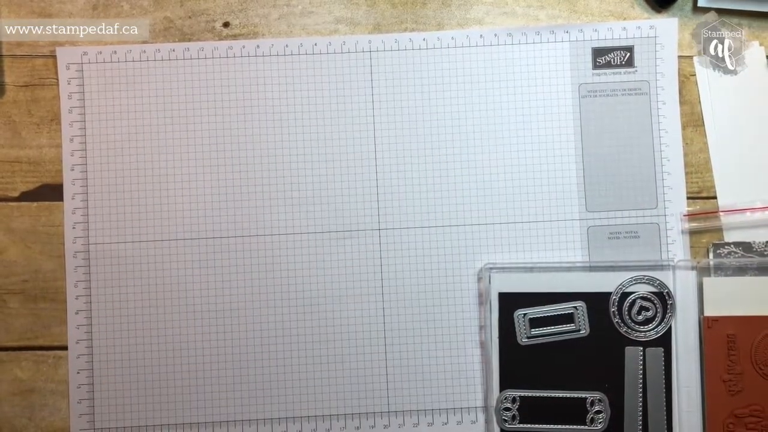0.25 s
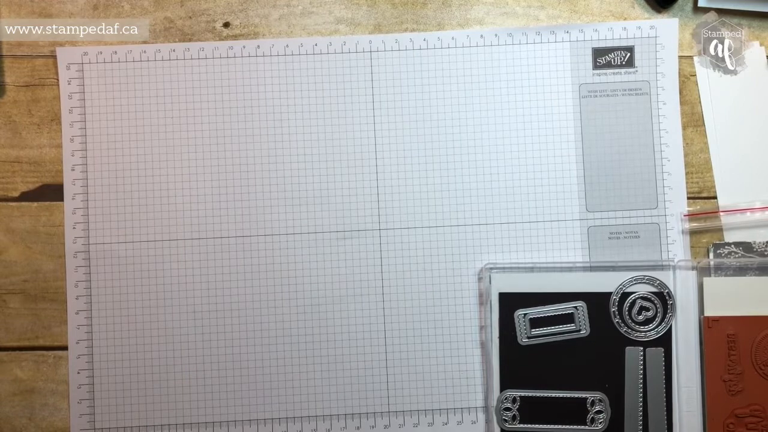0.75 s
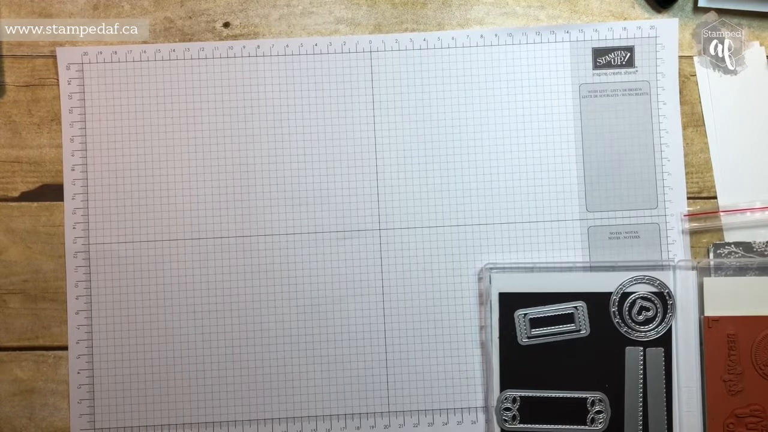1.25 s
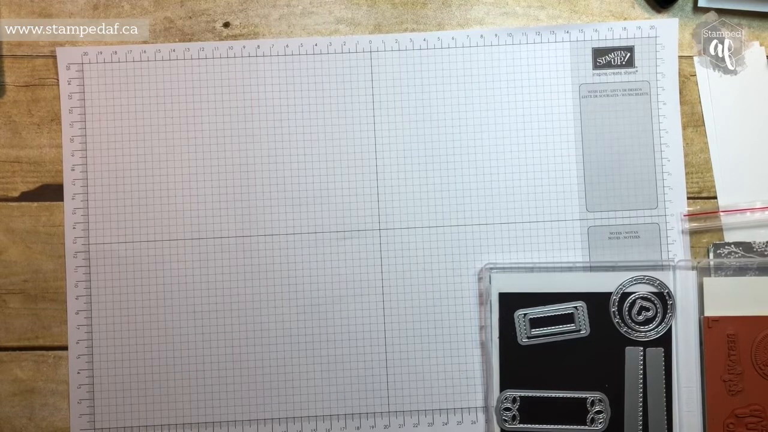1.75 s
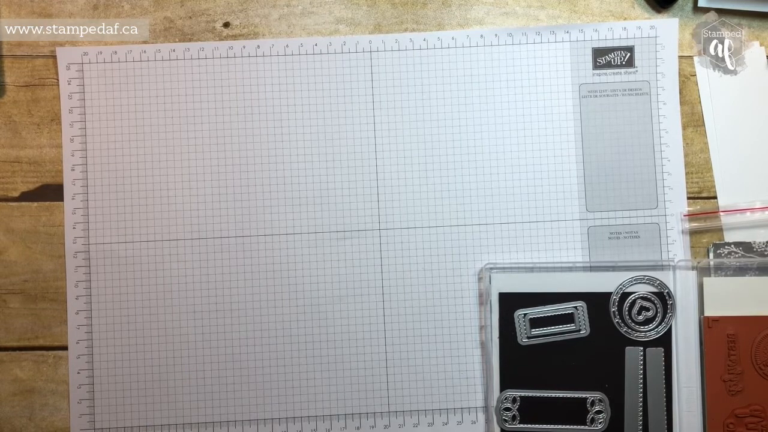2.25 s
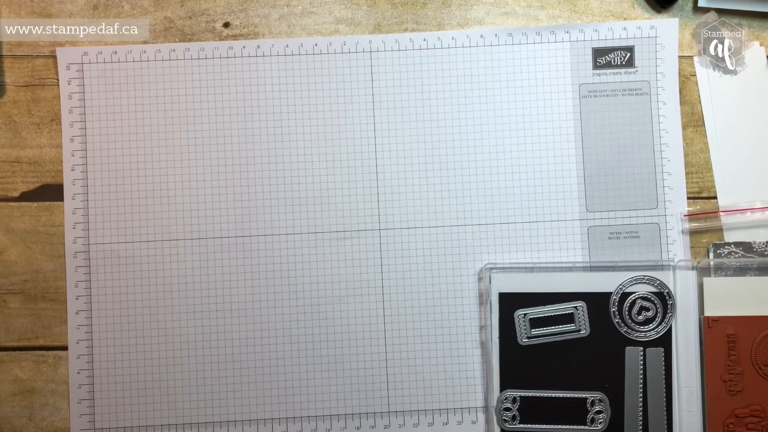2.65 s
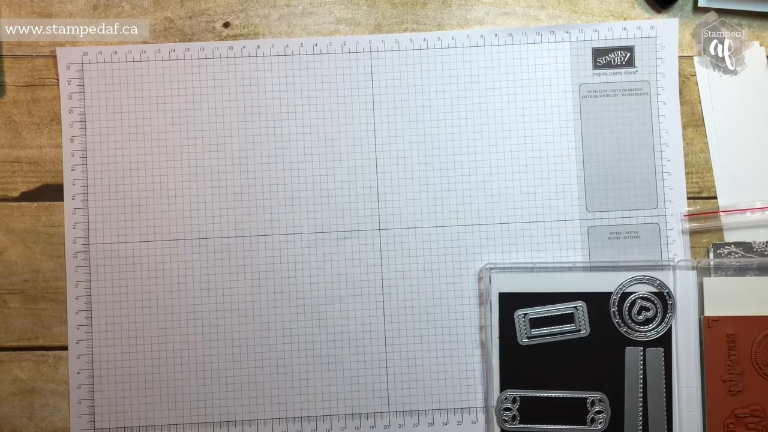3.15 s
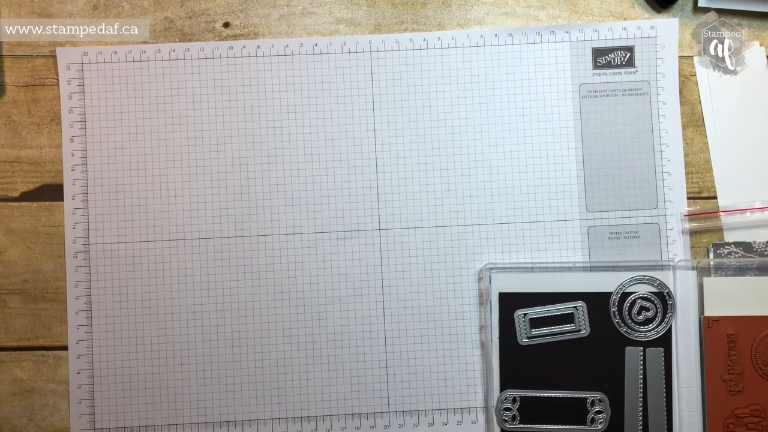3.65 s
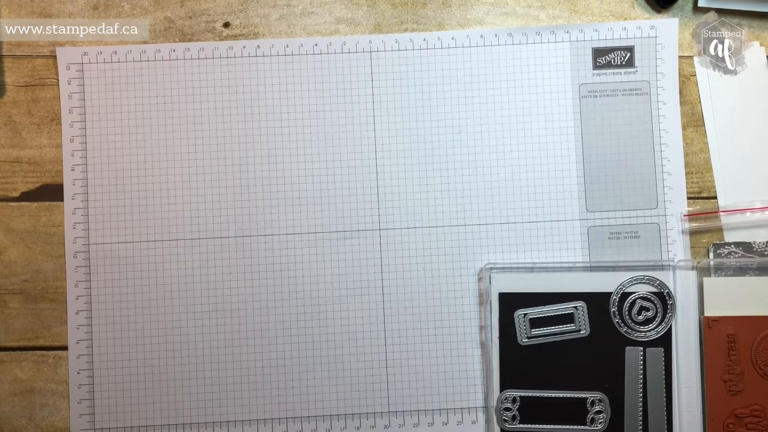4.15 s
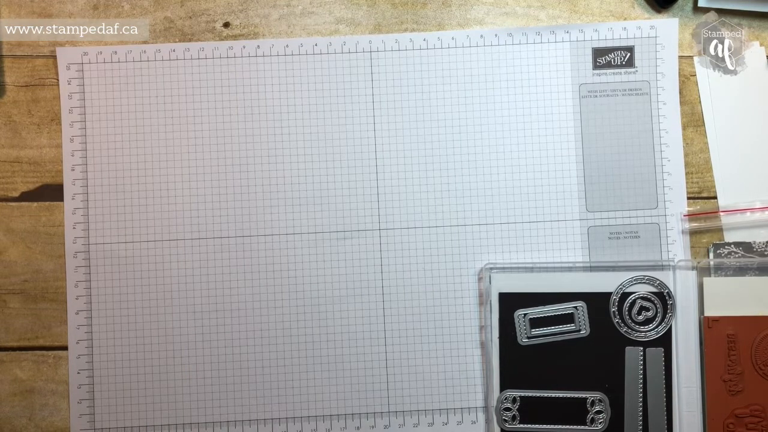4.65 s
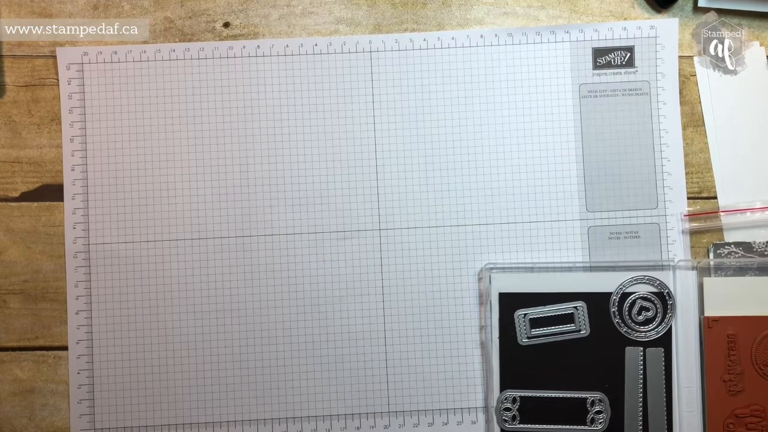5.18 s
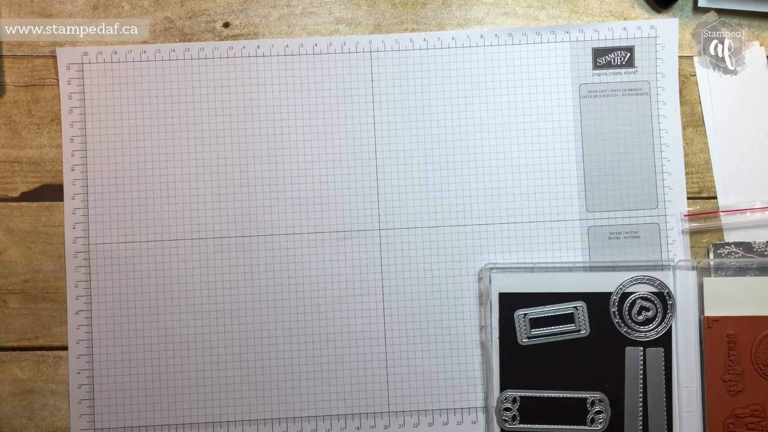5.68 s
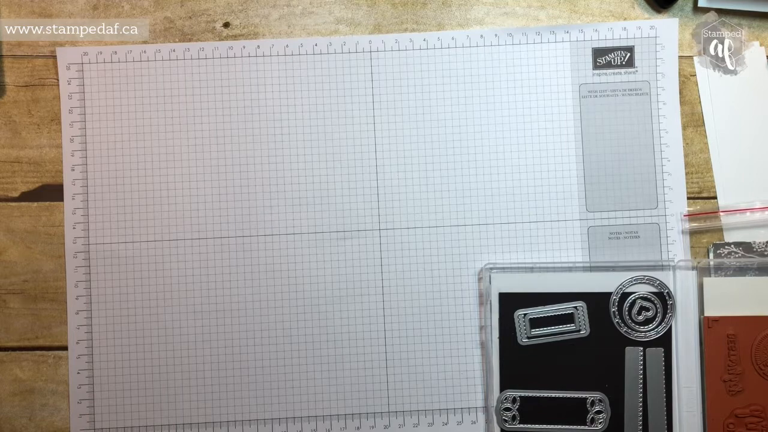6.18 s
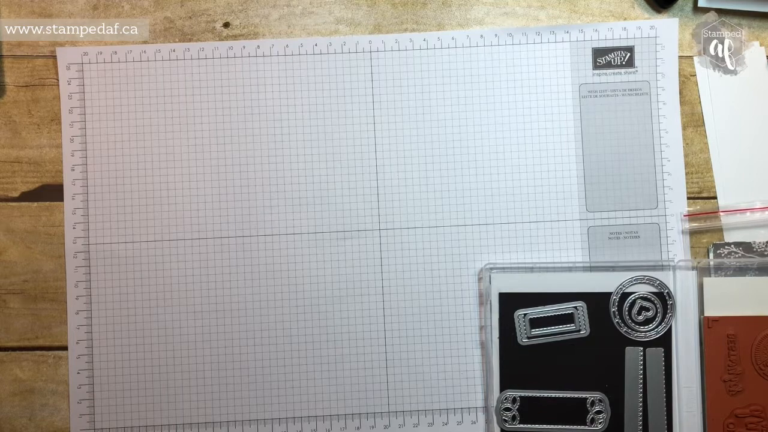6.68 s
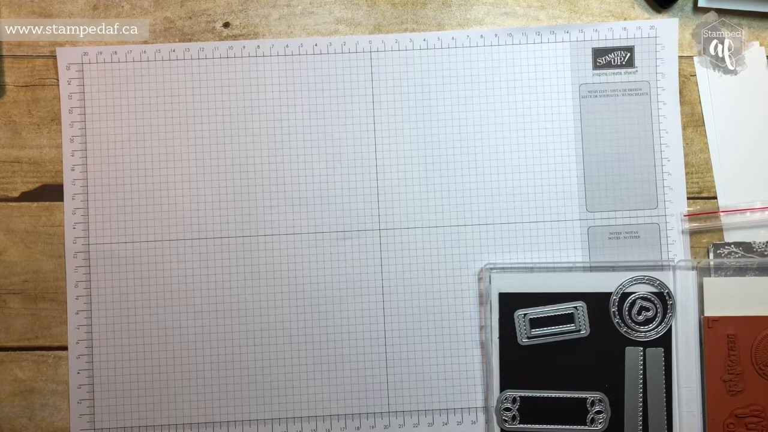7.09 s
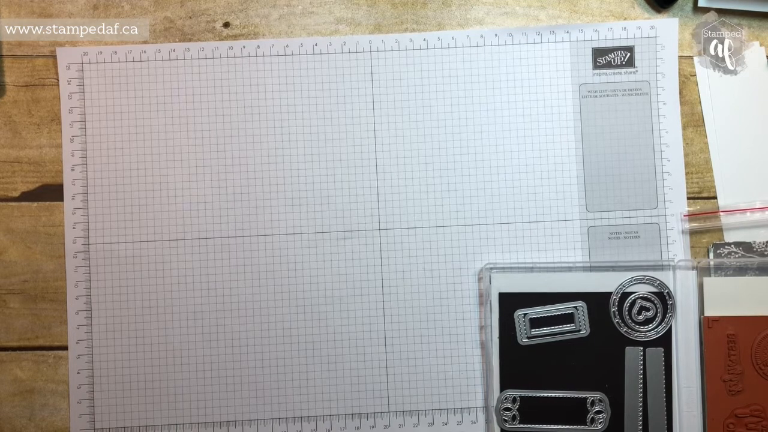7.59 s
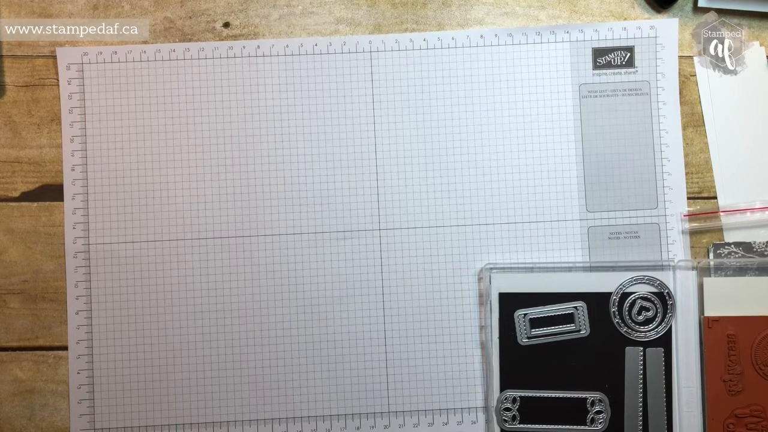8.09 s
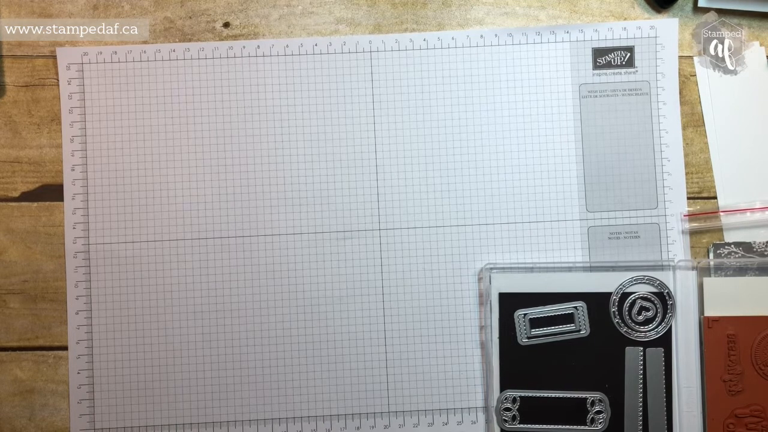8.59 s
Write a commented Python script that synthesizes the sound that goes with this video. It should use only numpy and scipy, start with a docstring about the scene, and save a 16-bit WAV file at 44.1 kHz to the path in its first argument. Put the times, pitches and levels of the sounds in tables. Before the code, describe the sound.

Close-up craft table sounds: dull sliding and a couple of knocks first, a few light metallic clinks, then rapid scratchy brushing on thin metal, hissy and slightly ringing. After a short gap the strokes return slower and more separated. Brushing ends, a hard clattering knock hits the table, and after near quiet there is a brief rustle and a softer bump. A faint steady fan hums throughout, with short room reflections.

```python
"""A stiff brush scrubs a thin metal cutting die on a craft table, in quick strokes and then slower ones.
Random bristle flicks and hiss drive coloured scratch, rub and fizz layers and the resonances of the die.
Snagging tufts tick: noise bursts plus decaying die modes; some clinks add two clean partials.
Things slide (swelling dull noise) and bump on the table (decaying modes, clatter), once with a loud knock.
A fan, coloured noise with wavering tones, hums in the small room, whose echo is decaying noise."""
import sys
import numpy as np
from scipy import signal
from scipy.io import wavfile
from scipy.ndimage import uniform_filter1d

SR = 44100
rng = np.random.default_rng(int(sys.argv[2]) if len(sys.argv) > 2 else 0)


def store_wav(level_fs):
    """Save 16-bit WAV to argv[1]."""
    pcm = np.round(np.clip(np.atleast_2d(level_fs), -1, 1) * 32767)
    wavfile.write(sys.argv[1], SR, pcm.T.astype(np.int16))


N = 389403

# bumps on the table: [t/s, rel. level/dB, thump/dB, clack/dB, crack/dB (bands re level), f of the thing/Hz]
KNOCKS = [(0.441, -25.5, -14, -2.5, -10.5, 1084), (0.536, -29, -11, -15, -10.5, 682),
          (0.781, -45, -23, -7, 0, 1170), (2.679, -30, -14, -9, -20, 320), (2.721, -47, -1, -16, -20, 330),
          (3.497, -38, -5, 0, -20, 318), (3.562, -36, -18, -6, -20, 340), (6.016, -42, -20, -14, -31, 684),
          (6.744, -41, -10, -3, -28, 995), (7.154, -27, -2.5, -14, -14.5, 324),
          (7.231, -18, -7, -3, -9.5, 360), (7.294, -12, -15, -3, -17, 692), (7.338, -22, -4, -7, -8, 344),
          (7.361, -28.5, -7, -11, -19, 644), (8.613, -37.5, -2, -3, -5, 1230),
          (8.756, -23, -8, -8, -20, 605)]
# resonances of the die, low, middle and high group: [f/Hz, nominal width/Hz, rel. level/dB]
DIE_MODES = [
    [(1247, 23, -11), (1705, 82, 8.5), (2283, 48, 4)],
    [(2847, 18, 2.5), (3000, 31, 0), (3135, 68, 8), (3340, 37, 3), (3370, 17, -2), (4000, 46, -6)],
    [(4060, 150, -22), (4960, 240, 0), (5150, 41, -18), (5380, 140, 1.5), (5776, 46, -2.5)],
]
# brush strokes: [t/s, swell/s, fade/s, rel. level/dB, rub of the backing/dB, fizz of the tips/dB,
# f where the die rings/Hz, ring/dB] (rub, fizz and ring re level, before layer trims)
STROKES = [(0.323, 0.022, 0.6, -65.5, -7, -15, 3190, -14), (0.556, 0.042, 0.047, -43, -12, -9.5, 4960, -8),
           (0.645, 0.031, 0.2, -60.5, -0.5, 0.5, 4900, -7), (1.014, 0.15, 0.097, -59.5, -17, -6, 4500, -9),
           (1.534, 0.041, 0.146, -42, -10.5, -4, 5150, -3), (1.656, 0.058, 0.144, -50, -25, -9, 1650, -3),
           (1.82, 0.018, 0.15, -44.5, -12, -4.5, 4900, -6),
           (1.949, 0.11, 0.037, -47.5, -13, -3, 1666, -0.5), (2.114, 0.058, 0.03, -46, -15, -7.5, 1650, 4),
           (2.17, 0.02, 0.066, -39.5, -13, -7.5, 3220, -0.5),
           (2.275, 0.047, 0.067, -46.0, -3.5, -7, 3270, -6), (2.391, 0.065, 0.12, -46, -1, -6, 1280, -4),
           (2.552, 0.08, 0.11, -47, 1.5, -3, 2830, 2.5), (2.664, 0.054, 0.081, -37.5, -12, -3.5, 3295, -2),
           (2.827, 0.047, 0.16, -46.5, 1, -0.5, 2930, 2), (2.954, 0.039, 0.12, -44, -8.5, -4, 1980, -2),
           (3.092, 0.056, 0.095, -45, -5, -1.5, 3150, -0.5), (3.229, 0.063, 0.074, -45.0, -2, -2, 3150, -4),
           (3.4, 0.037, 0.23, -45, -6, -6, 3005, -4.5), (3.524, 0.055, 0.027, -46.5, 1.5, -6, 3190, -1),
           (3.687, 0.053, 0.12, -52, -2.5, -4.5, 3170, -4), (3.849, 0.051, 0.03, -55.5, 0, -8, 3220, 0),
           (3.946, 0.052, 0.45, -67, -4, -3.5, 3860, -7), (4.269, 0.1, 0.16, -45, -9, -11.5, 4900, -16),
           (4.612, 0.057, 0.055, -42.5, -6.5, -5.5, 5380, -3.5),
           (4.801, 0.081, 0.077, -59, 0.5, -1, 5380, 4.5), (4.91, 0.024, 0.095, -49, -9, -4.5, 4960, -5),
           (5.055, 0.024, 0.52, -69.5, 0, -5, 5380, -6), (5.19, 0.066, 0.084, -48, -7, -6, 5000, -6.5),
           (5.334, 0.033, 0.47, -71.5, -4, -8, 3190, -3.5), (5.525, 0.059, 0.05, -47, -3.5, -4, 3190, -4),
           (5.769, 0.018, 0.14, -53.5, -4.5, -7, 3830, -6), (5.827, 0.055, 0.038, -59, 0, 1, 3020, 9),
           (6.029, 0.017, 0.068, -48.0, -2, -8.5, 3420, -3.5), (6.081, 0.043, 0.08, -52, -6, -3, 3190, -20),
           (6.262, 0.034, 0.088, -46.5, -4, -4.5, 3230, -18), (6.403, 0.019, 0.068, -56, 6, -5, 2830, 3)]
# spectrum of the bristle tips: [f/Hz, rel. level/dB]
FIZZ_SPECTRUM = [(3000, -41.5), (6000, -9.5), (7300, -3), (8300, 0), (9300, 2), (10300, 1.5), (12000, -1.5),
                 (14500, 0.5), (16000, -10)]


def gain_of(db):
    """Decibels to amplitude."""
    return 10 ** (np.asarray(db) / 20)


def evened(x):
    """Scales to rms 1."""
    return x / np.sqrt(np.mean(x ** 2) + 1e-20)


def struck(x, size=441):
    """Scales a hit so that its loudest 10 ms have rms 1."""
    return x / np.sqrt(uniform_filter1d(x ** 2, size).max() + 1e-20)


def read(points, hz):
    """Interpolates a curve on a log-frequency axis."""
    f, value = np.transpose(points)
    return np.interp(np.log(hz + 1), np.log(f), value)


def add(mix, start_s, sound):
    """Mixes a sound in at a time."""
    part = mix[max(round(start_s * SR), 0):][:len(sound)]
    part += sound[:len(part)]


def butter(x, order, hz, kind):
    """Causal Butterworth filter."""
    return signal.sosfilt(signal.butter(order, hz, kind, fs=SR, output="sos"), x)


def colour(x, points, size=4096):
    """Causal minimum-phase filter of energy 1 with the given spectral shape."""
    log_gain = np.log(gain_of(read(points, abs(np.fft.fftfreq(size, 1 / SR)))))
    min_phase = np.exp(np.conj(signal.hilbert(log_gain)))
    taps = np.fft.ifft(min_phase).real[:size // 2]
    return signal.oaconvolve(x, taps / np.linalg.norm(taps))[:len(x)]


def resonate(x, hz, width_hz):
    """A resonance of gain 1 at its centre."""
    return signal.lfilter(*signal.iirpeak(hz, hz / width_hz, SR), x)


def wander(x, depth_db, size=1024, order=7, count=7):
    """The contact point moves, so narrow bands swell and fade briefly: random gain patches on an STFT."""
    overlap = size * 3 // 4
    z = signal.stft(x, nperseg=size, noverlap=overlap)[2]
    patches = rng.standard_normal(z.shape)
    for axis, span in ((0, order), (1, count), (0, order // 2), (1, count // 2)):
        patches = uniform_filter1d(patches, span, axis)
    gain = gain_of(depth_db * np.tanh(evened(patches)))
    return evened(signal.istft(z * gain, nperseg=size, noverlap=overlap)[1][:N])


def swell(rise_s, fade_s):
    """Envelope of one sliding movement: it touches down, gathers speed and eases off."""
    touch_s, landing_db, fade_db = 0.0026, -11, -21  # levels re crest, fade_db after fade_s
    fade_bend = 1.02  # above 1 the fade steepens as the brush lifts
    t = np.arange(0, rise_s + 3 * fade_s, 1 / SR)
    rise_shape_db = landing_db * np.maximum(1 - t / rise_s, 0)
    fade_shape_db = fade_db * (np.maximum(t - rise_s, 0) / fade_s) ** fade_bend
    return np.minimum(t / touch_s, 1) * gain_of(rise_shape_db + fade_shape_db)


def effort(movements):
    """Power sum of overlapping movements [t/s, swell/s, fade/s, level/dB], as amplitude."""
    power = np.zeros(N)
    for start_s, rise_s, fade_s, db in movements:
        add(power, start_s, (gain_of(db) * swell(rise_s, fade_s)) ** 2)
    return np.sqrt(power)


def fan(air_db=-56.5, hum_trim_db=-1, waver_rms_hz=1.624):
    """Steady rush of air, as coloured noise, with slightly wavering motor tones."""
    # air rush: [f/Hz, rel. level/dB]
    air_spectrum = [(15, -34), (25, -75), (47, -14.5), (127, -5), (200, -11.5), (256, -5.5), (326, -16),
                    (476, -16.5), (516, -22.5), (775, -21), (1100, -28), (1740, -33.5), (2910, -37.5),
                    (3520, -36.5), (16000, -46)]
    # motor tones: [mean f/Hz, rms level before trim/dB]
    hum_tones = [(91.5, -92), (118.4, -62.5), (177.6, -62.5), (253.0, -72), (296.1, -68.5), (360.7, -71),
                 (721.4, -101), (791.3, -76)]
    out = gain_of(air_db) * evened(colour(rng.standard_normal(N), air_spectrum))
    for hz, db in hum_tones:
        drift_hz = waver_rms_hz * evened(uniform_filter1d(rng.standard_normal(N), size=4000))
        cycles = np.cumsum(hz + drift_hz) / SR + rng.random()
        out += gain_of(db + hum_trim_db) * np.sqrt(2) * np.sin(2 * np.pi * cycles)
    return out


def room(x, first_s=0.0028, size=256):
    """Dense reflections of a small room, each band dying at its own speed."""
    # decay of the room: [f/Hz, t60/s]
    room_decay = [(120, 0.19), (500, 0.3), (1500, 0.25), (3000, 0.27), (5500, 0.18), (9000, 0.18),
                  (16000, 0.14)]
    taps = rng.standard_normal(SR // 2) * (np.arange(SR // 2) > first_s * SR)
    hz, t, z = signal.stft(taps, SR, nperseg=size)
    decay_db = -60 * t / read(room_decay, hz)[:, None]
    tail = signal.istft(z * gain_of(decay_db), SR, nperseg=size)[1]
    return signal.fftconvolve(x, tail / np.linalg.norm(tail))[:N]


def handling(trim_db=-3, wander_db=6.0):
    """Soft, dull rustle of fingers and paper sliding on the table: noise under swelling envelopes."""
    # slides: [t/s, swell/s, fade/s, level before trim/dB]
    slides = [(0, 0.026, 0.15, -49.5), (0.1, 0.37, 0.9, -53.5), (1.08, 0.18, 0.3, -54.5),
              (1.3, 0.15, 0.35, -49.5), (1.6, 0.22, 0.39, -48), (6.4, 0.11, 0.4, -54),
              (6.73, 0.024, 0.046, -50.5), (7.9, 0.03, 0.069, -63), (8.58, 0.012, 0.091, -43),
              (8.69, 0.016, 0.11, -43), (8.74, 0.1, 0.25, -44)]
    # slide noise: [f/Hz, rel. level/dB]
    slide_spectrum = [(60, -15), (200, 0), (450, 2.5), (800, -6.5), (1400, -6.5), (2200, -15),
                      (4000, -18.5), (8000, -25), (16000, -42)]
    rustle = colour(wander(rng.standard_normal(N), wander_db), slide_spectrum)
    return gain_of(trim_db) * effort(slides) * rustle


def knocks(trim_db=-7, body_db=-2, thump_trim_db=-1, crack_trim_db=-2, rise_s=0.000754, contact=0.81,
           bounce_s=0.0062, clatter_s=0.0088, crack_s=0.021,
           boom_db=-8, boom_hz=134, boom_t60_s=0.24, boom_rise_s=0.01, own_db=-3, own_t60_s=0.024):
    """An edge lands, bounces once and rings the table while loose parts clatter; balanced in four bands."""
    # modes of the table and what lies on it: [f/Hz, rel. level/dB, t60/s]
    table_modes = [(57, -16, 0.38), (181, 1, 0.41), (223.5, 5.5, 0.26), (316.5, 5, 0.085), (350, 3, 0.12),
                   (364, 6, 0.078), (613, -4, 0.037), (652, 1.5, 0.029), (745, -14, 0.099),
                   (1032, -15, 0.071), (1059, 3.5, 0.1), (1230, -20, 0.077), (1304, 7, 0.041),
                   (1630, -38, 0.044), (1746, 10, 0.024), (1900, -18, .05), (2535, -4.5, 0.074),
                   (2740, -2, 0.1), (4300, -29, .06)]
    # loose parts: [f/Hz, rel. level/dB]
    clatter_spectrum = [(45, -6), (110, 0), (350, -5), (500, -6.5), (740, -9.5), (1150, 1.5), (1750, -13),
                        (2150, -13.5), (2700, -20.5), (4000, -25), (5800, -27), (8500, -36.5),
                        (16000, -40.5)]
    out, t = np.zeros(N), np.arange(SR // 2) / SR
    bands_hz = [(55, 230), (250, 1100), (1100, 2100), (2400, 16000)]  # thump, body, clack, crack
    ring = sum((-1) ** k * gain_of(db - 60 * t / t60_s) * np.sin(2 * np.pi * hz * t)
               for k, (hz, db, t60_s) in enumerate(table_modes))
    # the whole table top takes a moment to swing, then booms on
    boom_env = gain_of(-60 * t / boom_t60_s) * (1 - np.exp(-t / boom_rise_s))
    boom = struck(np.sin(2 * np.pi * boom_hz * t) * boom_env)
    attack = 1 - np.exp(-t / rise_s)
    for start_s, db, thump_db, clack_db, crack_db, own_hz in KNOCKS:
        hit_db = trim_db + db
        touches = np.zeros(len(t))
        add(touches, 2 * rise_s, np.ones(1))
        add(touches, 2 * rise_s + bounce_s * rng.uniform(0.848, 1.2), np.ones(1))
        loose = colour(rng.standard_normal(len(t)), clatter_spectrum)
        blow = struck(ring) + contact * struck(colour(touches, clatter_spectrum))
        blow += struck(loose * np.exp(-t / clatter_s))
        rattle = loose * np.exp(-t / crack_s)  # the treble is all loose parts
        levels_db = (thump_trim_db + thump_db, body_db, clack_db, crack_trim_db + crack_db)
        for band_hz, source, part_db in zip(bands_hz, (blow, blow, blow, rattle), levels_db):
            part = butter(source * attack, 2, band_hz, "bandpass")
            add(out, start_s, gain_of(hit_db + part_db) * struck(part))
        add(out, start_s, gain_of(hit_db + thump_db + boom_db) * boom)
        # the thing itself rings briefly
        own = np.sin(2 * np.pi * own_hz * t) * gain_of(-60 * t / own_t60_s) * attack
        add(out, start_s + 2 * rise_s, gain_of(hit_db + own_db) * struck(own))
    return out


def shaken(level_re_knock_db=-46, t60_s=0.57, rise_s=0.012, ring_hz=2700):
    """Each knock shakes a loose metal piece on the table, and it rings on faintly."""
    out, t = np.zeros(N), np.arange(SR) / SR
    envelope = gain_of(-60 * t / t60_s) * (1 - np.exp(-t / rise_s))
    ring = struck(np.sin(2 * np.pi * ring_hz * t) * envelope)
    for start_s, db, *_ in KNOCKS:
        add(out, start_s, gain_of(level_re_knock_db + db) * ring)
    return out


def pings(t60_s=0.08):
    """The loosely held die clinks: two clean partials of the thin metal die away."""
    # clinks: [t/s, level of main/dB, main f/Hz, second f/Hz, second re main/dB]
    clinks = [(1.2654, -39.5, 1307, 1662, -2), (1.362, -47, 3520, 1660, -2), (2.401, -38, 1327, 1400, -6.5),
              (2.482, -39, 1320, 2800, -4.5), (4.428, -43, 5180, 5400, -4), (7.671, -48, 5760, 2500, -6)]
    out, t = np.zeros(N), np.arange(SR // 4) / SR
    for start_s, db, hz, second_hz, second_db in clinks:
        tones = np.sin(2 * np.pi * hz * t) + gain_of(second_db) * np.sin(2 * np.pi * second_hz * t)
        add(out, start_s, gain_of(db - 60 * t / t60_s) * tones)
    return out


def snags(count=2, level_db=-3, scatter_db=3.5, scatter_s=0.025, scatter_oct=0.66, snap_db=-23, ring_db=1):
    """Light chance ticks near each stroke, their level following it; rows as in the tick table."""
    chance = rng.standard_normal((len(STROKES), count, 3))
    rows = []
    for (start_s, rise_s, _, db, _, _, hz, _), draws in zip(STROKES, chance):
        for when, size, pitch in draws:
            snag_s = start_s + abs(rise_s + scatter_s * when)
            snag_hz = np.clip(hz * 2 ** (scatter_oct * pitch), 1200, 5800)
            rows.append((snag_s, db + level_db + scatter_db * size, snag_hz, snap_db, ring_db))
    return rows


def ticks(trim_db=-9, snap_trim_db=2, snap_s=0.00084, rattle=0.55, rattle_s=0.014,
          free=0.95, reach_oct=0.25, cut=0.17):
    """A caught tuft lets go: a sharp snap, a short rattle, and the nearest modes of the die ring on freely."""
    # snagging tufts and handling of the die: [t/s, rel. level/dB, centre f of ring/Hz,
    # snap before trim/dB, ring/dB] (snap and ring re level)
    tick_events = [(0.56, -47, 1190, -18, -16), (1.2634, -41, 1300, -3, 1), (1.3084, -50, 1200, -3, -3),
                   (1.362, -41, 3630, -4, -22), (1.4744, -51, 3470, -2, -9), (1.5424, -40, 5150, 1.5, 1),
                   (1.6362, -41.5, 5190, 5, 2), (1.932, -29, 5300, -9.5, -2.5),
                   (2.4005, -34.5, 1330, -12, -13), (2.4836, -31.5, 1500, -10, -4),
                   (2.6239, -29.5, 2760, -30, -16), (2.6784, -42.5, 3130, -17, 9.5),
                   (2.9956, -33.5, 3200, 7, -4), (3.2891, -39, 3100, -20, 4), (3.4032, -43, 2940, -18, -15),
                   (3.5528, -33, 1750, -18, 2.5), (4.159, -51.5, 3850, -27, -16),
                   (4.2704, -48, 3550, -20, -10), (4.4278, -46.5, 5110, 1, 12),
                   (4.6305, -39, 5970, -16, 2.5), (4.849, -54, 5430, -12, 18.5),
                   (4.9213, -35.5, 4840, -18, 3.5), (5.0644, -60, 5650, -10, 3),
                   (5.574, -47, 3150, -6, -11), (5.7718, -51, 3930, -19, -14), (6.2716, -36, 3080, -14, 2),
                   (6.4113, -33.5, 2740, -12, -9), (7.5284, -55.5, 3100, -16, -4),
                   (7.6707, -37.5, 4930, -14, -3), (7.777, -49.5, 3060, -10, -4), (8.5842, -51, 1130, 4, 5),
                   (8.702, -45, 1700, -12, -11)]
    # body of the snap: [f/Hz, rel. level/dB]
    snap_spectrum = [(200, -11), (900, 9), (3000, 12.5), (5500, 9.5), (8000, 6.5), (16000, -10.5)]
    out, t = np.zeros(N), np.arange(SR // 8) / SR
    mode_hz, width_hz, mode_db = np.vstack(DIE_MODES).T[:, :, None]
    decay = np.exp(-np.pi * free * width_hz * t)  # free scales the widths
    modes = gain_of(mode_db) * decay * np.sin(2 * np.pi * mode_hz * t)
    burst_env = np.exp(-t / snap_s) + rattle * np.exp(-t / rattle_s)
    for start_s, db, hz, bright_db, ring_db in tick_events + snags():
        burst = rng.standard_normal(len(t)) * burst_env
        share = np.exp(-.5 * (np.log2(mode_hz / hz) / reach_oct) ** 2)
        share = share * rng.choice([-1, 1], mode_hz.shape)
        ring = struck((share * modes).sum(0))
        # a small, stiff contact gives little far below its ring
        body = butter(colour(burst, snap_spectrum, size=512), 2, cut * hz, "highpass")
        bright = struck(colour(burst, FIZZ_SPECTRUM, size=512))
        snap = 1.07 * struck(body) + gain_of(snap_trim_db + bright_db) * bright
        add(out, start_s, gain_of(trim_db + db) * (snap + gain_of(ring_db) * ring))
    return out


def bristles(flicks_per_s=2400, spread_db=4.1, slide=0.6, clump_db=1.9, clump_hz=150):
    """Single bristles flick off the edges, over the hiss of those that slide, both swelling in clumps."""
    chance, size = rng.random(N), rng.exponential(1, N)
    signs, clumps = np.sign(rng.standard_normal(N)), rng.standard_normal(N)
    flicks = (chance < flicks_per_s / SR) * gain_of(spread_db * np.minimum(size, 5)) * signs
    clumps = evened(butter(clumps, 2, clump_hz, "lowpass"))
    return evened((evened(flicks) + slide * rng.standard_normal(N)) * gain_of(clump_db * clumps))


def ringing(trim_db=-1, wander_db=5, reach_oct=0.38, grip_detune=0.0084):
    """Each stroke drives the die modes near its pitch; the shifting grip detunes them."""
    out, push = np.zeros(N), wander(bristles(), wander_db)
    mode_hz, width_hz, mode_db = np.vstack(DIE_MODES).T
    detunes = 1 + grip_detune * rng.standard_normal((len(STROKES), len(mode_hz)))
    for (start_s, rise_s, fade_s, db, _, _, hz, ring_db), detune in zip(STROKES, detunes):
        envelope = swell(rise_s, fade_s)
        drive = np.resize(push[round(start_s * SR):], len(envelope))
        share = gain_of(mode_db) * np.exp(-.5 * (np.log2(mode_hz / hz) / reach_oct) ** 2)
        ring = sum(g * resonate(drive, f, w) for g, f, w in zip(share, mode_hz * detune, width_hz))
        add(out, start_s, gain_of(trim_db + db + ring_db) * envelope * evened(ring))
    return out


def scrubbing(scratch_db=-2.0, fizz_trim_db=1, scratch_wander_db=4, rub_wander_db=6, fizz_wander_db=3):
    """The bristles scratch the metal, rub the backing and fizz at their tips."""
    # metal scratch: [f/Hz, rel. level/dB]
    scratch_spectrum = [(700, -26), (1800, -8), (2600, -4.5), (3500, 5), (5600, 3.5), (7000, -7),
                        (9000, -24), (16000, -42)]
    # rub of the backing: [f/Hz, rel. level/dB]
    rub_spectrum = [(40, -7.5), (150, -15), (330, 2.5), (560, -7.5), (900, -1.5), (1300, -0.5),
                    (1900, -6.5), (2800, -17), (6000, -32)]
    start_s, rise_s, fade_s, level_db, rub_db, fizz_db = np.transpose(STROKES)[:6]
    drive = bristles()
    scratch = colour(wander(drive, scratch_wander_db), scratch_spectrum)
    rub = colour(wander(bristles(clump_db=4.0), rub_wander_db), rub_spectrum)
    tips = wander(drive + bristles(), fizz_wander_db, size=256, order=4, count=5)
    fizz = colour(tips, FIZZ_SPECTRUM)
    layers = ((scratch_db, scratch), (rub_db, rub), (fizz_trim_db + fizz_db, fizz))
    return sum(effort(zip(start_s, rise_s, fade_s, level_db + db)) * sound for db, sound in layers)


def scene(scrub_room_db=-8, tick_room_db=-3, knock_room_db=-4):
    """Brush, die and table with the room around them, over the fan."""
    scrub = scrubbing() + ringing() + handling()
    tick = ticks() + pings()
    knock = knocks() + shaken()
    send = gain_of(scrub_room_db) * scrub + gain_of(tick_room_db) * tick + gain_of(knock_room_db) * knock
    return (scrub + tick + knock + room(send) + fan())[None]


def record(dry, bass_hz=38, edge_hz=15900):
    """The microphone's bass roll-off and the recorder's band limit."""
    thin = butter(dry, 3, bass_hz, "highpass")
    taps = signal.firwin(511, edge_hz, window=("kaiser", 9), fs=SR)
    return signal.oaconvolve(thin, taps[None], "same")


dry = scene()
out = record(dry)
store_wav(out)
```